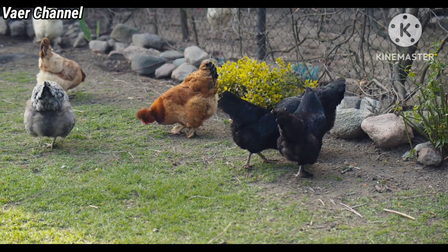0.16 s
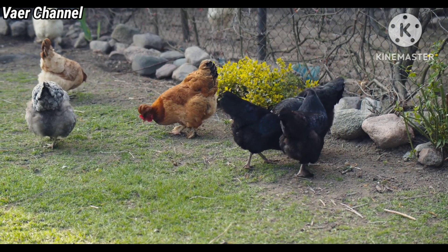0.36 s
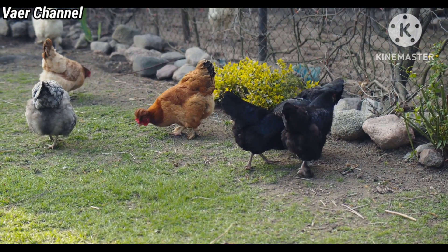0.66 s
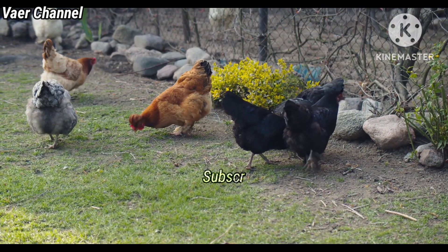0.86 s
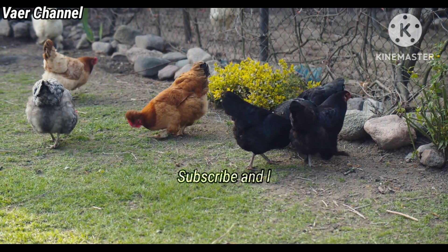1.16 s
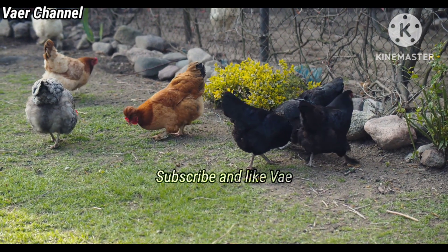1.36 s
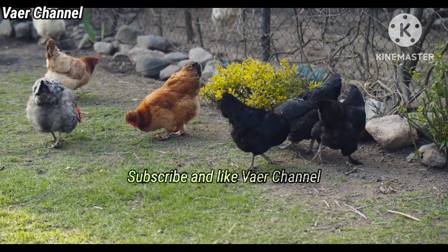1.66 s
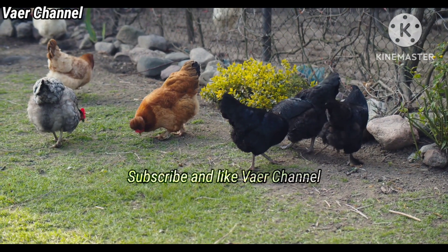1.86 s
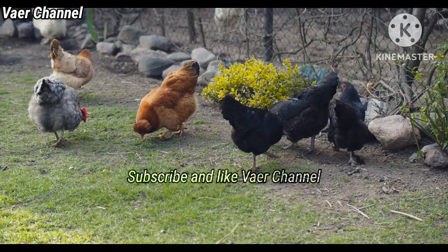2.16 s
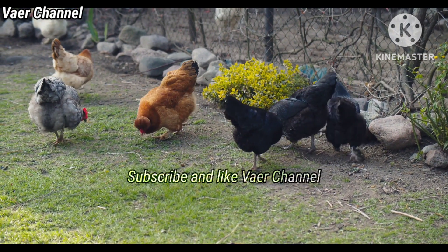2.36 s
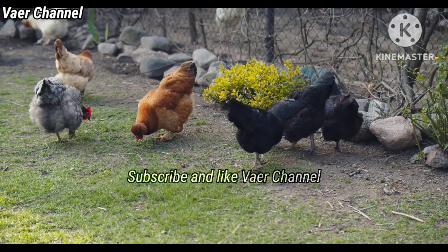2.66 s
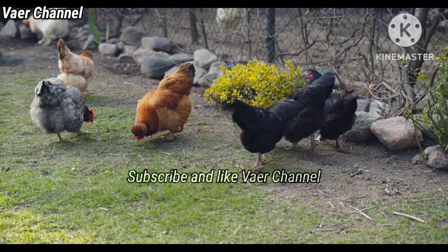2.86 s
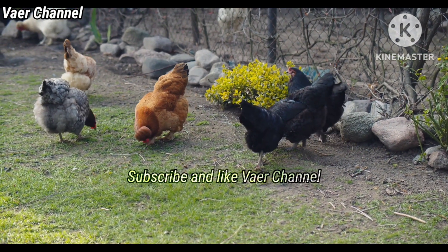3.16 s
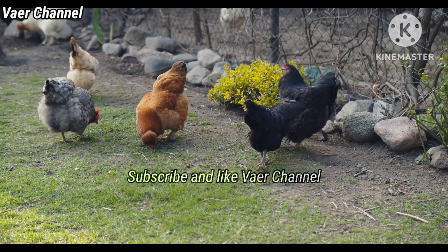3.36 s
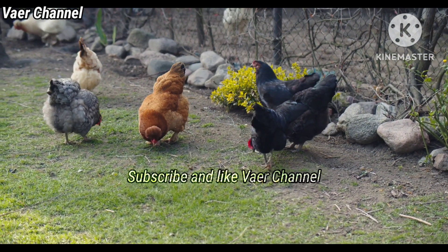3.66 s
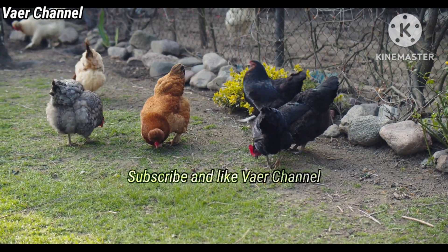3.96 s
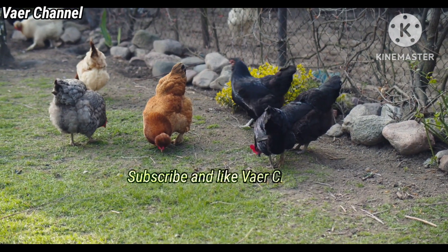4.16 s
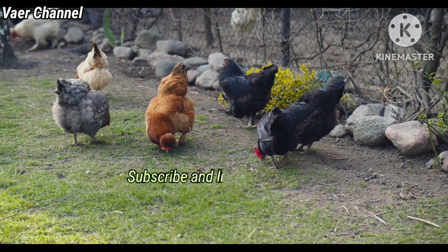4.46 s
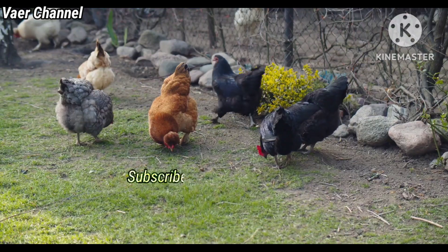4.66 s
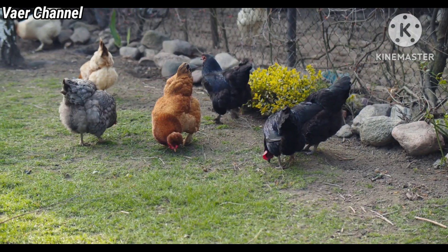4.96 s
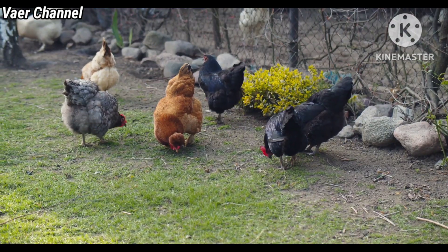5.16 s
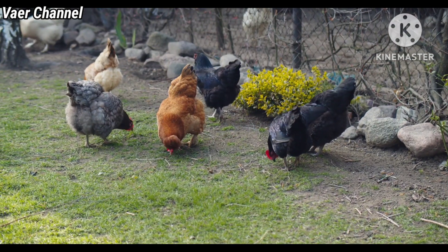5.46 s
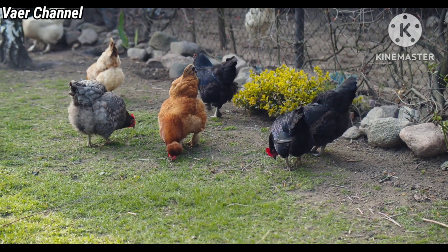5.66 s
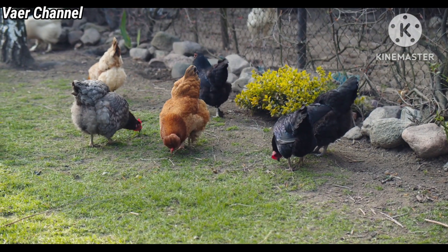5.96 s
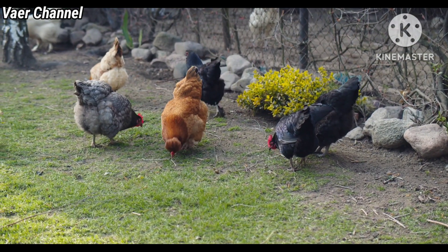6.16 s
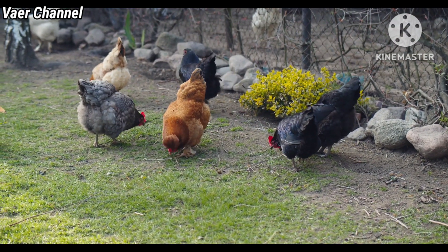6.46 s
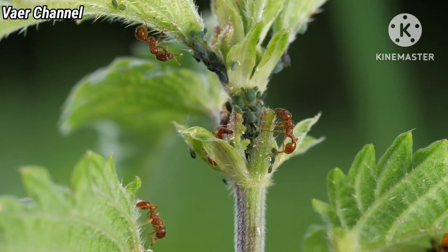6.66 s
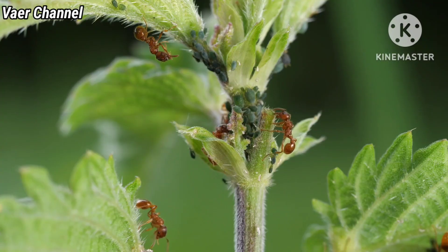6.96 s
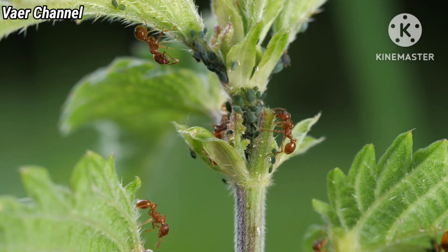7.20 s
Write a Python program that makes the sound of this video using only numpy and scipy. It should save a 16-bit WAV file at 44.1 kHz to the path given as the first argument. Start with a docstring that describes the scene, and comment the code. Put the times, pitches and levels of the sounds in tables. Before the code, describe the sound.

In a garden, a hen close to the microphone opens with a loud squawk, then gives runs of short, hoarse clucks that twice build to another clear squawk with a cracked ending. An engine hums low in the distance, small birds whistle far off, and there are a few soft knocks. Near the end the garden cuts off abruptly and dry leaves crackle faintly.

```python
"""A garden, with a hen cackling close by: runs of hoarse clucks and loud, clear squawks that end in a crack.
Her voice is a source and a filter: the syrinx buzzes, and throat and beak shape its spectrum.
An engine hums in the distance, small birds whistle far off, and there are a few soft knocks.
At 6.7 s the garden cuts off and dry leaves take over, tiny impulses ringing them into a fine crackle."""
import sys
import numpy as np
from scipy import signal
from scipy.fft import rfft, irfft, next_fast_len
from scipy.io import wavfile
from scipy.ndimage import uniform_filter1d, minimum_filter1d

SR = 44100
rng = np.random.default_rng(int(sys.argv[2]) if len(sys.argv) > 2 else 0)


def to_wav(s):
    """Save 16-bit WAV."""
    ch = np.atleast_2d(s).T  # columns
    pcm = np.round(np.clip(ch, -1, 1) * 32767)  # PCM
    wavfile.write(sys.argv[1], SR, pcm.astype(np.int16))


N = 323253
TIME = np.arange(N) / SR
TOP_HZ = 10300  # upper band edge of voice, air, knocks and crackle


def amp(db):
    """Decibels to amplitude ratio."""
    return 10 ** (np.asarray(db) / 20)


def unit(x):
    """Normalisation to rms 1."""
    return x / np.sqrt(np.mean(x ** 2) + 1e-20)


def read(points, hz):
    """Interpolation on a log-frequency axis."""
    f, value = np.transpose(points)
    return np.interp(np.log(hz + 1), np.log(f + 1), value)


def level(rows):
    """Amplitude envelope over the scene from rows of (time [s], level [dB])."""
    return amp(np.interp(TIME, *np.transpose(rows)))


def add(mix, s, sound):
    """Superposition: a sound joins the mix at time s."""
    part = mix[max(round(s * SR), 0):][:len(sound)]
    part += sound[:len(part)]


def colour(x, points):
    """Minimum-phase filtering: x rings causally with the given spectrum."""
    log_gain = np.log(amp(read(points, abs(np.fft.fftfreq(4096, 1 / SR)))))
    ring = np.fft.ifft(np.exp(np.conj(signal.hilbert(log_gain)))).real
    return signal.fftconvolve(x, ring[:len(ring) // 2])[:len(x)]


def noise(points):
    """Stationary noise of rms 1 with the given spectral shape."""
    gain = amp(read(points, np.fft.rfftfreq(N, 1 / SR)))
    return unit(irfft(rfft(rng.standard_normal(N)) * gain, N))


def wander(size, hz):
    """Random modulation of rms about 1 and bandwidth hz."""
    span = next_fast_len(size + SR)
    keep = np.exp(-(np.fft.rfftfreq(span, 1 / SR) / hz) ** 2)
    return unit(irfft(rfft(rng.standard_normal(span)) * keep, span))[:size]


def below(x, hz):
    """Linear-phase low-pass filtering."""
    return signal.fftconvolve(x, signal.firwin(201, hz, window=("kaiser", 7), fs=SR), "same")


def steady(x):
    """Division by the running rms evens the level and leaves the fine structure."""
    window = signal.windows.hann(1101)
    return x / np.sqrt(abs(signal.fftconvolve(x ** 2, window / window.sum(), "same")) + 1e-9)


# engine orders (frequency [Hz], relative level [dB])
ENGINE_ORDERS = [(34.5, -52), (51.5, -60.5), (69.3, -49.5), (103, -49.5), (139, -46)]
# rumble spectrum (frequency [Hz], relative density [dB])
RUMBLE_SPECTRUM = [(15, -20), (32, 0), (60, -11), (105, 3), (160, -3), (220, -12.5), (350, -15),
                   (700, -54.5), (3000, -93.5)]
# envelope of hum and rumble (time [s], level [dB])
ENGINE_ENVELOPE = [(0.0, -34), (0.11, -43.5), (2.15, -40.5), (2.56, -47), (3.44, -41.5), (3.53, -48),
                   (5.03, -51.5), (5.61, -40), (6.04, -52.5), (6.52, -43), (6.67, -47.5)]

def engine(waver=.014, throb=.63):
    """The orders of a rotating engine waver together with its speed; each throbs alone amid the rumble."""
    warped_time = np.cumsum(1 + waver * wander(N, 3.3)) / SR
    hum = np.zeros(N)
    for hz, db in ENGINE_ORDERS:
        gain = amp(db) * (1 + throb * wander(N, 8))
        hum += gain * np.sin(2 * np.pi * (hz * warped_time + rng.random()))
    return level(ENGINE_ENVELOPE) * (unit(hum) + noise(RUMBLE_SPECTRUM))


# spectrum of the open air (frequency [Hz], relative density [dB])
AIR_SPECTRUM = [(100, -16), (250, 3.5), (450, -2), (700, -4), (1250, -7.5), (2000, -12), (3200, -20),
                (5300, -17.5), (7000, -22.5), (9500, -23), (11000, -54)]
# its envelope (time [s], relative level [dB])
AIR_ENVELOPE = [(0, -63), (1, -50), (2.5, -56.5), (3.2, -44.5), (4.1, -60), (4.5, -62.5), (5.2, -58.5),
                (6.1, -55), (6.68, -55.5)]

def air():
    """Broadband noise under slow amplitude modulation: the soft wash of open air."""
    drift = amp(-1.5 + .8 * wander(N, 8))
    return level(AIR_ENVELOPE) * drift * below(noise(AIR_SPECTRUM), TOP_HZ)


def hen_voice(gesture, throat, jitter, jitter_hz, doubling, rasp, hiss_db,
              effort_db, ring_db, edge_db, attack_s, release_s):
    """Source and filter: the syrinx buzzes through the throat. Returns the onset time and the sound."""
    times, *columns = gesture
    t = np.arange(times[0], times[-1] + .002, 1 / SR)
    hz, effort, rough, ring, edge = (np.interp(t, times, column) for column in columns)
    rough, size = np.clip(rough, .01, 1), len(t)
    turns = np.cumsum(hz * (1 + (.0025 + jitter * rough) * wander(size, jitter_hz))) / SR
    # as the hen moves, the echoes shift and each upper harmonic swells and sinks by a few dB
    sway_hz, sway_start = rng.uniform(2, 9, 22), rng.random(22)
    pulses = np.zeros(size)
    for k in range(1, 22):
        sway_db = np.clip(k - 2, 0, 3) * np.sin(2 * np.pi * (sway_hz[k] * t + sway_start[k]))
        pulses += amp(sway_db) * np.cos(2 * np.pi * k * turns)
    # period doubling: strong and weak cycles alternate
    pulses = unit(pulses) * (1 + doubling * np.sqrt(rough) * np.cos(np.pi * turns))
    puffs = unit((.45 + np.exp(-(turns % 1) / .9)) * rng.standard_normal(size))
    puffs = puffs - .6 * below(puffs, 850)  # the narrow airway makes little low noise
    hiss = unit(np.diff(puffs, prepend=0))  # turbulence blurs the high harmonics first
    source = (1 - rough) * pulses + rasp * rough * puffs + amp(hiss_db) * np.sqrt(rough) * hiss
    voice = colour(source, throat)
    # three bands: the body, the ring at 2-3 kHz and the edge above it
    body, body_and_ring = below(voice, 2250), below(voice, 3200)
    ring_band = amp(ring + ring_db) * steady(body_and_ring - body)
    edge_band = amp(edge + edge_db) * steady(below(voice, TOP_HZ) - body_and_ring)
    fade = np.clip((t - t[0]) / attack_s, 0, 1) * np.clip((t[-1] - t) / release_s, 0, 1)
    return times[0], amp(effort + effort_db) * (steady(body) + ring_band + edge_band) * fade


def squawk_gesture(curve, usual_hz=690):
    """Spectral balance follows effort: the edge varies less than the body, so a sag sounds thin."""
    times, *columns = np.transpose(curve)
    t = np.arange(times[0], times[-1], .001)
    hz, effort, rough, ring = (np.interp(t, times, column) for column in columns)
    flare_db = 6 * np.exp(-((times[-1] - .016 - t) / .01) ** 2)  # just before the voice cracks
    tension_db = 14 * np.log2(hz / usual_hz)  # a slack syrinx dulls the edge
    edge = -19.5 + .25 * effort + tension_db + flare_db
    pressed_rough = rough + .12 * amp(effort)
    return t, hz, effort, pressed_rough, ring - effort, edge - effort


# throat response with the beak wide open (frequency [Hz], gain [dB])
OPEN_THROAT = [(300, -32), (520, -17.5), (700, -17.5), (860, -4), (1080, -5), (1400, 0), (1750, -16),
               (2100, -18), (2400, -9), (2720, -10), (3100, -23.5), (3480, -17), (3800, -21.5),
               (4250, -19.5), (4550, -22.5), (5000, -22), (6500, -26), (7300, -27.5), (8400, -30),
               (9300, -31.5), (10800, -42.5)]
# one curve per squawk (time [s], pitch [Hz], effort [dB], roughness [0-1], ring [dB])
SQUAWK_CURVES = [
    [(0.0, 699, -8, 0.4, -32), (0.02, 688.3, -5, 0, -36.5), (0.04, 701.7, -8, 0.03, -38.5),
     (0.07, 729, -7.5, 0.06, -25.5), (0.082, 704.4, -5.5, 0.08, -29), (0.098, 662, -12, 0, -36.5)],
    [(3.447, 718, -10.5, 0.65, -20), (3.471, 719, -5.5, 0.08, -19.5), (3.507, 719.6, -8, 0.02, -27),
     (3.523, 688, -9, 0.1, -26), (3.533, 668.6, -23, 0, -10), (3.545, 667, -15.5, 0.01, -17),
     (3.573, 661.4, -17, 0.04, -11.5), (3.605, 665.5, -22, 0, -22), (3.639, 681.5, -5, 0, -26),
     (3.658, 712, -11.5, 0.07, -25)],
    [(5.614, 586, -19.5, 0.79, -36.5), (5.642, 589.7, -11, 0.08, -23.5), (5.672, 637, -13.5, 0.05, -27.5),
     (5.688, 694, -14, 0.33, -27), (5.704, 696.4, -4.5, 0, -13), (5.722, 708.8, -3.5, 0.1, -26.5),
     (5.75, 718, -7, 0, -17), (5.806, 663.7, -18, 0, -31), (5.868, 671, -31.5, 0.1, -33),
     (5.886, 710, -5, 0, -41), (5.906, 660, -10.5, 0.03, -19.5)],
]

def squawks():
    """Nearly periodic vibration gives a clear, harmonic call that crests, sags and crests again."""
    out = np.zeros(N)
    for curve in SQUAWK_CURVES:
        add(out, *hen_voice(squawk_gesture(curve), OPEN_THROAT, jitter=.071, jitter_hz=200,
                            doubling=.3, rasp=.9, hiss_db=2.5, effort_db=-.5, ring_db=-1.5, edge_db=-1,
                            attack_s=.0059, release_s=.01))
    return out


def push_gesture(s, length, first_hz, last_hz, effort_db, roughness, ring_db, edge_db, crest):
    """One push of air drives the syrinx: effort arches, pitch glides and the ring grows."""
    progress = np.linspace(0, 1, 33)
    hz = last_hz + (first_hz - last_hz) * (1 + np.cos(np.pi * progress)) / 2
    effort = effort_db - 27 * (progress - crest) ** 2
    rough = roughness + .33 * (2 * progress - 1) ** 2  # rougher as the syrinx starts and stops
    lag_db = 10.5 * np.exp(-length * progress / .0071)  # the treble comes in just after the body
    ring = ring_db + 12.5 * (progress - .5) - lag_db
    edge = edge_db - .5 * (progress - .5) - lag_db
    return s + length * progress, hz, effort, rough, ring, edge


# breaks of the voice (time [s], duration [s], first pitch [Hz], last pitch [Hz], effort [dB],
# roughness [0-1], relative ring [dB], relative edge [dB])
VOICE_CRACKS = [(0.088, .048, 658, 570, -12.5, 0.23, -12.5, -14),
                (3.649, .05, 681.4, 592, -11.5, 0.5, -8.5, -14.5),
                (5.9, 0.054, 656, 559, -11.5, 0.71, -9, -16)]

def cracks():
    """Vibration turns irregular at the end of each squawk: a falling rasp, loudest early."""
    out = np.zeros(N)
    for row in VOICE_CRACKS:
        add(out, *hen_voice(push_gesture(*row, crest=.19), OPEN_THROAT, jitter=.07, jitter_hz=205,
                            doubling=.2, rasp=1, hiss_db=-6.5, effort_db=-1.5, ring_db=-2, edge_db=2.5,
                            attack_s=.0051, release_s=.012))
    return out


# blows (time [s], level [dB], spectral tilt [dB/octave], 60 dB decay time [s])
BLOWS = [(.314, -33.5, 2.5, 0.3), (3.974, -33.5, -2.5, 0.25), (4.02, -37, -5.5, 0.24),
         (4.921, -52, 24, 0.068)]
# response of the struck body (frequency [Hz], gain [dB])
STRUCK_BODY = [(120, 2), (280, 2), (480, 3), (800, -10.5), (1300, -12.5), (2100, -12.5), (2700, -35),
               (6000, -49)]

def knocks():
    """Damped vibration decays exponentially after a blow: dull knocks and one light tick."""
    out, t = np.zeros(N), np.arange(SR // 3) / SR
    for s, db, tilt, t60 in BLOWS:
        body = [(hz, gain + tilt * np.log2(hz)) for hz, gain in STRUCK_BODY]
        add(out, s, amp(db - 60 * t / t60) * unit(colour(rng.standard_normal(len(t)), body)))
    return below(out, TOP_HZ)


# songbird notes (time [s], duration [s], first pitch [Hz], last pitch [Hz], relative level [dB])
WHISTLE_NOTES = [(0.673, 0.28, 5520, 3980, -68), (0.97, 0.22, 3840, 2694, -55),
                 (2.029, 0.096, 2255, 2530, -42.5), (2.609, 0.044, 2213, 2620, -56),
                 (2.629, 0.11, 2125, 2018, -51), (2.796, 0.035, 3030, 2380, -51),
                 (2.838, 0.029, 3870, 2580, -46.5), (4.897, .14, 2800, 3250, -72)]

def whistles(notes=WHISTLE_NOTES):
    """Frequency modulation: each songbird note is a pure tone that glides and wavers."""
    out = np.zeros(N)
    for s, length, first_hz, last_hz, db in notes:
        size = int(length * SR)
        hz = np.linspace(first_hz, last_hz, size) * (1 + .025 * wander(size, 150))
        tone = np.sin(2 * np.pi * np.cumsum(hz) / SR) * signal.windows.tukey(size, .7)
        add(out, s, amp(db) * unit(tone))
    return out


# throat response with the beak nearly shut (frequency [Hz], gain [dB])
SHUT_THROAT = [(250, -16), (500, -23), (740, -21.5), (1020, -3), (1270, -3), (1600, -1.5), (2200, -23),
               (3050, -21.5), (3850, -25), (4550, -15.5), (5950, -20.5), (6500, -41.5), (7300, -33),
               (8100, -45.5), (9400, -31.5), (10600, -50.5)]
# clucks (time [s], duration [s], first pitch [Hz], last pitch [Hz], effort [dB], roughness [0-1],
# relative ring [dB], relative edge [dB], crest position [share of duration])
CLUCK_PUSHES = [(0.956, 0.041, 621, 576, -16.5, 0.31, -28.5, -29.5, 0.68),
                (1.215, 0.057, 577.8, 489.6, -12.5, 0.52, -22.5, -20, 0.76),
                (1.457, .062, 550.5, 483.4, -13.5, 0.47, -22.5, -18.5, 0.78),
                (1.786, 0.069, 594, 469.6, -12.5, 0.52, -22, -19.5, 0.65),
                (2.086, 0.069, 566, 479, -13, 0.46, -18.5, -20, .56),
                (2.898, 0.053, 545.2, 485, -12.5, 0.47, -21, -16, .62),
                (3.115, 0.065, 558.7, 474.5, -13.5, 0.35, -20, -21, 0.52),
                (3.322, .072, 527, 506.8, -11, 0.2, -19.5, -17.5, 0.65),
                (3.39, .072, 506.6, 514, -14, .52, -10.5, -15, 0.53),
                (5.322, 0.043, 549.5, 509, -8, 0.33, -20.5, -17.5, 0.92),
                (5.535, 0.071, 554, 490, -12.5, 0.43, -17, -18, 0.63)]

def clucks():
    """Aperiodic vibration sounds hoarse: the cycles wobble, alternate and break into puffs."""
    out = np.zeros(N)
    for row in CLUCK_PUSHES:
        add(out, *hen_voice(push_gesture(*row), SHUT_THROAT, jitter=.045, jitter_hz=220,
                            doubling=.46, rasp=1, hiss_db=5.5, effort_db=.5, ring_db=-1, edge_db=1.5,
                            attack_s=.0093, release_s=.01))
    return out


def trill(start_s=2.352, period_s=.0226, pip_s=.018, fall_hz=420, count=9):
    """Periodic repetition of falling pips, low and weak then high and strong, swelling midway."""
    k = np.arange(count)
    swing = -np.cos(np.pi * k)
    pitches = 2637 + 153.7 * swing
    levels = -46.5 + 2.5 * swing - 3 * np.linspace(-1, 1, count) ** 2
    pips = zip(start_s + period_s * k, pitches, levels)
    return whistles([(s, pip_s, hz, hz - fall_hz, db) for s, hz, db in pips])


# envelope of a rasping bird note (time [s], relative level [dB])
BUZZ_ENVELOPE = [(3.8, -51), (3.924, -47), (4.06, -65.5)]

def bird_buzz(flutter_hz=70):
    """Fast amplitude modulation of a noise band is heard as a rasp."""
    band = noise([(2200, -20), (3300, -9), (3800, -4), (4400, -14), (5200, -53)])
    flutter = 1 + .5 * np.sin(2 * np.pi * flutter_hz * TIME)
    sounding = (TIME > BUZZ_ENVELOPE[0][0]) & (TIME < BUZZ_ENVELOPE[-1][0])
    return level(BUZZ_ENVELOPE) * band * flutter * sounding


# spectrum of the swell (frequency [Hz], relative density [dB])
SWELL_SPECTRUM = [(30, -3), (90, 7.5), (280, -1), (420, -15), (800, -28), (1250, -4), (2000, -40),
                  (5000, -45)]

def swell(peak_s=6.5, peak_db=-46, rise_db_per_s=150, fall_db_per_s=77):
    """Exponential growth and decay of a low, soft noise."""
    fade_db = np.maximum((peak_s - TIME) * rise_db_per_s, (TIME - peak_s) * fall_db_per_s)
    return amp(peak_db - fade_db) * noise(SWELL_SPECTRUM)


# snaps of dry leaves (time [s], relative peak level [dB])
SNAPS = [(6.788, -41.5), (6.813, -47), (6.871, -37.5), (6.903, -31), (7.035, -35), (7.093, -40),
         (7.11, -34.5), (7.161, -28.5), (7.213, -41.5), (7.261, -32.5), (7.295, -27.5), (7.308, -26)]
# resonances of the leaves (frequency [Hz], gain [dB])
LEAF_RESPONSE = [(900, -26), (1600, -23), (2800, -17), (3400, -5.5), (4000, 5.5), (4500, -5.5),
                 (5300, -18.5), (6200, -11.5), (6900, -15.5), (7450, -13.5), (8200, -29), (11000, -44)]
# air around the leaves (frequency [Hz], relative density [dB])
LEAF_AIR_SPECTRUM = [(12, -36.5), (20, 10), (345, -10), (477, -9), (672, -7.5), (1260, -15), (1450, -10),
                     (2500, -15), (3250, -2.5), (5500, -120)]

def leaves(start_s, grains_per_s=2000, growth_db_per_s=12.5, snap_t60=.024):
    """Impulse excitation: dense random crackles and a few sharper snaps ring the same dry leaves."""
    sizes = amp(3.6 * np.minimum(rng.exponential(1, N), 4)) * rng.choice([-1, 1], N)
    crackle = unit(colour(sizes * (rng.random(N) < grains_per_s / SR), LEAF_RESPONSE))
    out = amp(-58.5 + growth_db_per_s * (TIME - start_s)) * crackle
    t = np.arange(SR // 20) / SR
    for s, db in SNAPS:
        flurry = np.exp(-np.maximum((s - TIME) / .0075, (TIME - s) / .019))  # stirred up by the snap
        out += amp(db - 13) * flurry * crackle
        snap = colour(rng.standard_normal(len(t)) * amp(-60 * t / snap_t60), LEAF_RESPONSE)
        add(out, s, amp(db + 1.5) * snap / abs(snap).max())
    return below(out, TOP_HZ) + amp(-61.5 + 1.1 * wander(N, 24)) * noise(LEAF_AIR_SPECTRUM)


# early reflections from ground, stones and fence (delay [s], gain [dB])
EARLY_REFLECTIONS = [(.00395, -23), (.00485, -15), (.00585, -19), (.009, -20.5), (0.0142, -8.5)]
# reverberation of the garden (frequency [Hz], 60 dB decay time [s])
REVERB_TIMES = [(200, .6), (700, 0.83), (1300, 0.55), (2500, 0.2), (5000, 0.18), (9000, 0.31)]

def garden(close, distant, near_t60=.26):
    """Reflection: stones and fence return sound at once, treble most; trees and walls add a faint tail."""
    taps = rng.choice([-1., 1.], (2, SR)) * (rng.random((2, SR)) < 3000 / SR)
    age = np.arange(SR) / SR
    near = taps[0] * (age > .005) * amp(-60 * age / near_t60)
    near = near / np.linalg.norm(near)
    near = amp(-13) * near + amp(-11) * (near - below(near, 3900))
    late = taps[1] * (age > .03)
    hz, t, spectrum = signal.stft(late, SR, nperseg=256)
    far = signal.istft(spectrum * amp(-60 * t / read(REVERB_TIMES, hz)[:, None]), SR)[1][:SR]
    far = far / np.linalg.norm(late * amp(-60 * age / read(REVERB_TIMES, 1300)))
    echoes = near + amp(-15.5) * far
    echoes = echoes - .061 * below(echoes, 730)  # long waves slip past twigs and wire
    for delay, db in EARLY_REFLECTIONS:
        add(echoes, delay, [amp(db)])
    return close + .69 * distant + signal.fftconvolve(close + distant, echoes)[:N]


def scene(cut_s=6.682, leaves_s=6.714, fade_s=.002):
    """Level panning sets the garden slightly left; it stops dead before the leaves begin in the centre."""
    sides = np.array([[1], [-1]])
    close = clucks() + squawks() + cracks() + knocks()
    songbirds = amp(-2) * (whistles() + trill() + bird_buzz())
    calls = garden(close, songbirds) * amp(.27 * sides)
    ambience = (engine() + air() + swell()) * amp(1.15 * sides)
    antiphase_rumble = sides * amp(-23) * level(ENGINE_ENVELOPE) * noise(RUMBLE_SPECTRUM)
    garden_on = np.clip((cut_s - TIME) / fade_s, 0, 1)
    leaves_on = np.clip((TIME - leaves_s) / fade_s, 0, 1)
    return (calls + ambience + antiphase_rumble) * garden_on + leaves(leaves_s) * leaves_on


def record(dry, ceiling=1.127, band_limit_hz=15800):
    """Peak limiting holds the loudest squawks, whose tips still clip at full scale; a low-pass follows."""
    allowed_gain = np.minimum(ceiling / (abs(dry).max(0) + 1e-9), 1)
    gain = uniform_filter1d(minimum_filter1d(allowed_gain, size=150), size=150)
    return np.array([below(channel, band_limit_hz) for channel in np.clip(dry * gain, -1, 1)])


dry = scene()
out = record(dry)
to_wav(out)
```